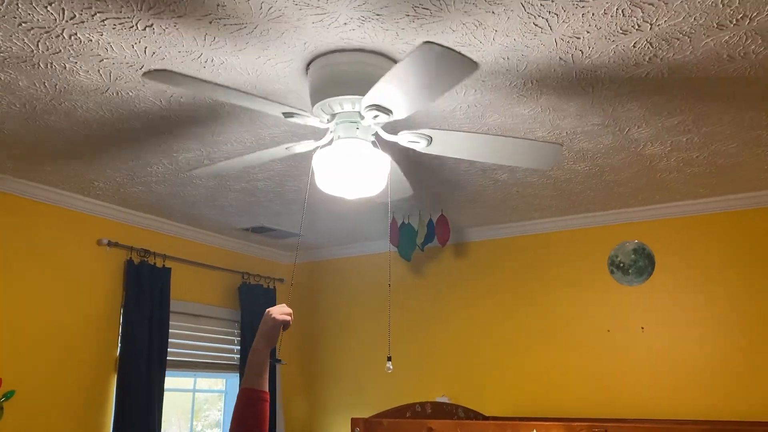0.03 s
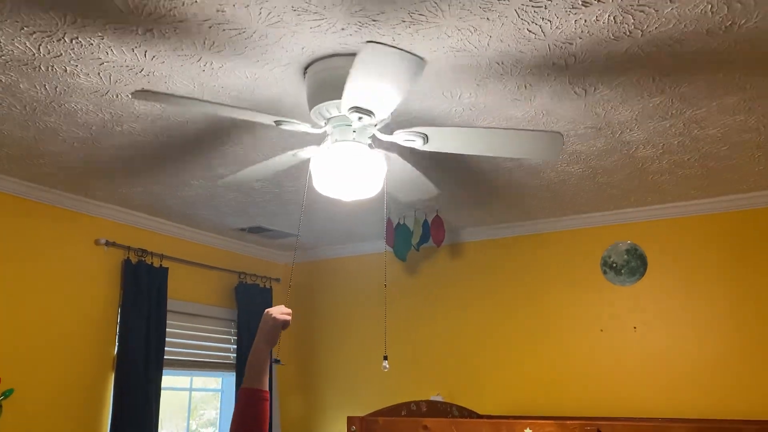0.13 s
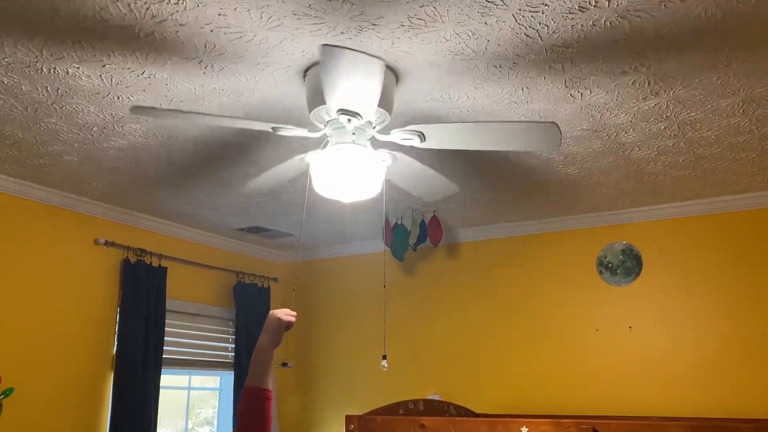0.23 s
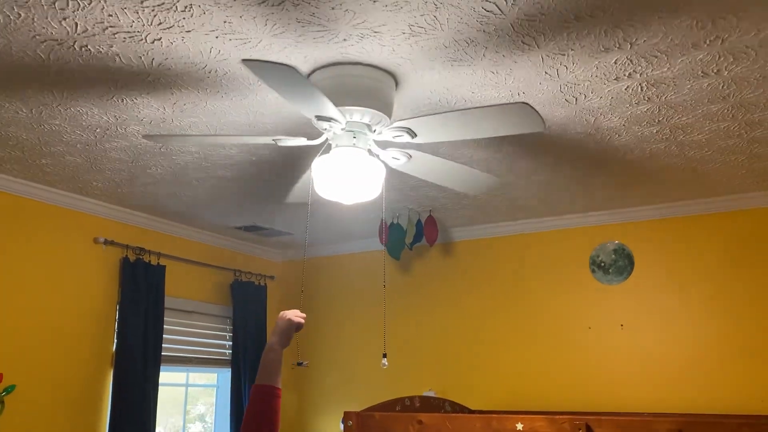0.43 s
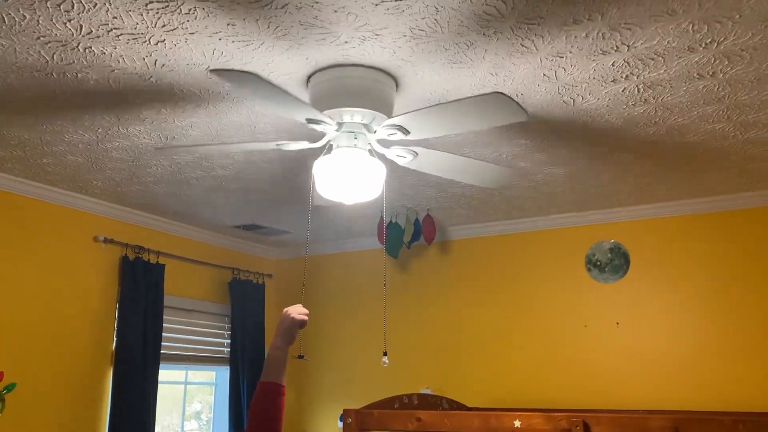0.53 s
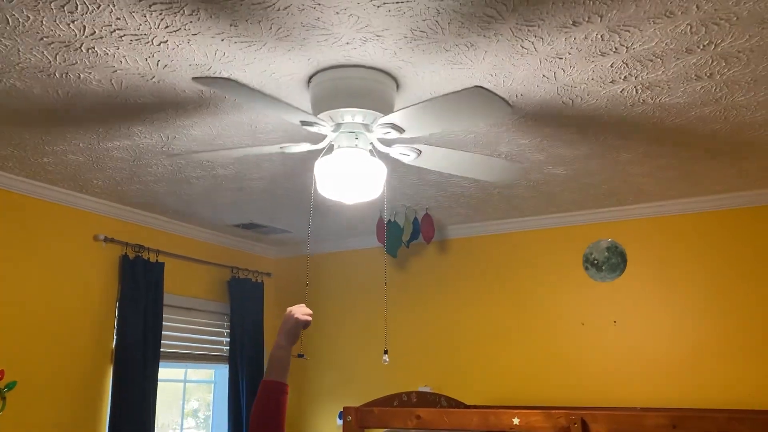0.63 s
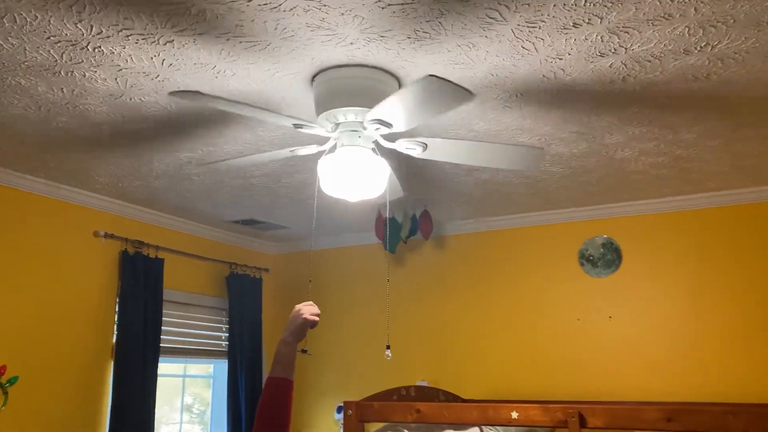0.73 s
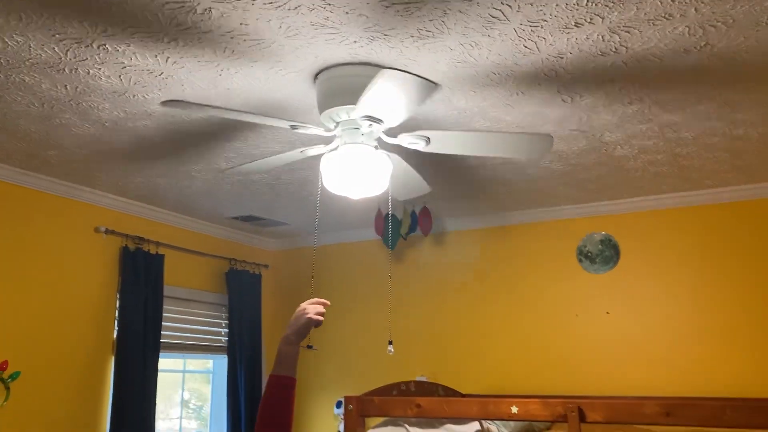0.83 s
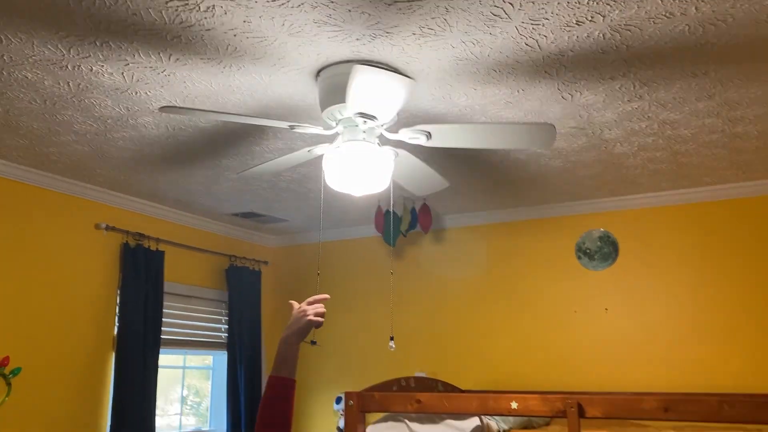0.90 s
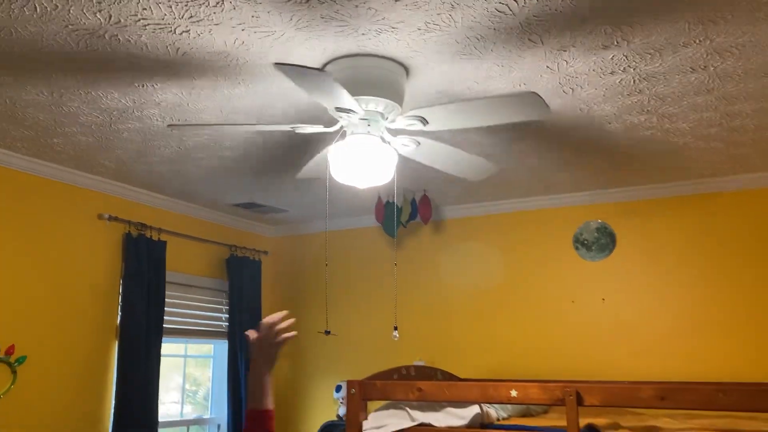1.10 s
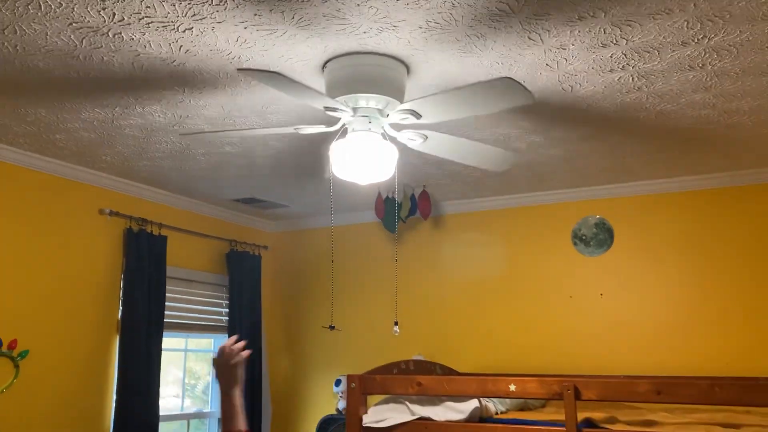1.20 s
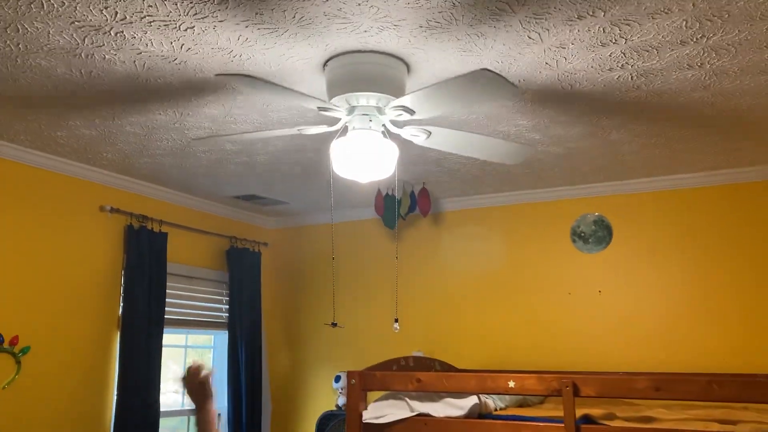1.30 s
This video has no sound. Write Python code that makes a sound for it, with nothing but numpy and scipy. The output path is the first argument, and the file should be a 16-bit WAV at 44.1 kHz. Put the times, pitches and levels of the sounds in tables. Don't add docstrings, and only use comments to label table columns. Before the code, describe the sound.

A ceiling fan pull-chain switch clicks in a small bedroom. A faint ratchet tick comes at 0.1 s, then a quick metallic double click at 0.23 and 0.27 s, the second brighter, with a low thud. A light tick at 0.5 s leads straight into the loudest, driest snap at 0.52 s. Short reverberation fades into faint chain rubbing, soft sleeve brush near 1.0 s, and low steady hum.

```python
import sys
import numpy as np
from scipy import signal
from scipy.fft import rfft, irfft
from scipy.io import wavfile
from scipy.ndimage import map_coordinates

SR = 44100
rng = np.random.default_rng(int(sys.argv[2]) if len(sys.argv) > 2 else 0)


def unload_audio(sound):
    columns = np.transpose(np.atleast_2d(sound))
    steps = np.round(np.clip(columns, -1, 1) * 32767)
    wavfile.write(sys.argv[1], SR, steps.astype(np.int16))


def boost(x):
    u = np.asarray(x, float) / 20
    return 10 ** u


N = 59535

# t/s, level/dB, chatter length/s, treble level/dB, canopy ring level/dB
CONTACTS = [
    (0.1037, -60, 0.0083, -11.5, -6),
    (0.1963, -62.5, .003, -19.5, -18),
    (.2288, -42, 0.011, -11, 4),
    (0.2705, -40.5, 0.0077, 11, 2.5),
    (0.441, -66.5, 0.0082, -3, -20.5),
    (0.5005, -52.5, 0.01, -7, -17),
    (.5240, -30.5, 0.0013, -1.5, -14.5),
]


def at_hz(points, hz):
    f, value = np.array(points).T
    return np.interp(np.log(hz), np.log(f), value)


def in_time(rows):
    return np.interp(np.arange(N) / SR, *np.transpose(rows))


def rms_one(x):
    return x / np.sqrt(np.mean(x ** 2) + 1e-20)


def drift(rate):
    knots = rng.standard_normal(200)
    return map_coordinates(knots, [np.arange(N) / SR * 2 * rate], order=3)


def bands(pair, gain_at):
    # f/Hz, coherence/1
    likeness = [(60, 0.93), (150, 0.7), (300, 0.8), (640, .5), (1400, 0.02), (16000, 0.05)]
    out = 0
    edges = 20 * 2 ** np.arange(0, 9.9, 1 / 3)
    for k, (low, high) in enumerate(zip(edges, edges[1:])):
        band = signal.butter(3, [low, high], "band", fs=SR, output="sos")
        mid, side = signal.sosfilt(band, pair[k % 2])
        hz = np.sqrt(low * high)
        alike = np.clip(at_hz(likeness, hz), 0, 1)
        stereo = np.sqrt(1 + alike) * mid + np.sqrt(1 - alike) * side * [[1], [-1]]
        out = out + gain_at(hz) * stereo
    return out


def coloured(source, colour, patchy_db):
    flicker = bands(source, lambda hz: boost(patchy_db * drift(12)))
    hz = np.arange(1, N // 2 + 2) * SR / N
    return rms_one(irfft(rfft(flicker) * boost(at_hz(colour, hz)), N))


def grains(per_s, spread_db):
    shape = (2, 2, N)
    hit = rng.random(shape) < per_s / SR
    size = boost(spread_db * np.minimum(rng.exponential(1, shape), 4))
    return hit * size * rng.choice([-1, 1], shape)


def chain():
    # t/s, level/dB
    rub = [(0, -60.5), (.07, -72.5), (.12, -60.5), (.2, -64), (.4, -66.5), (.72, -63.5), (.95, -64),
           (1.16, -66.5), (1.3, -83), (1.35, -85)]
    # f/Hz, level per Hz/dB
    rub_colour = [(420, -5), (750, -6.5), (1650, 0.5), (2080, 3), (2600, -9.5), (3000, -24.5), (4200, -15),
                  (6000, -35)]
    return boost(in_time(rub)) * coloured(grains(4000, 1.2), rub_colour, patchy_db=1.5)


def hum():
    # f/Hz, rms level/dB
    lines = [(120, -66.5), (240, -85.5), (360, -81.5)]
    t = np.arange(N) / SR
    return sum(np.sqrt(2) * boost(db) * np.sin(2 * np.pi * hz * t) for hz, db in lines)


def quiet_air():
    # f/Hz, level per Hz/dB
    air_colour = [(22, -15.5), (55, -1), (130, -7), (200, -18), (450, -18.5), (1000, -34), (12500, -51),
                  (15000, -68)]
    return boost(-64.5) * coloured(rng.standard_normal((2, 2, N)), air_colour, patchy_db=2.5)


def mount():
    # t/s, level/dB, length/s, f/Hz
    jolts = [
        (0.092, -52.5, 0.01, 72.5),
        (0.241, -48, 0.031, 68.3),
        (0.273, -48, .09, 78.3),
        (0.556, -57.5, 0.037, 74.3),
        (1.032, -61, .08, 50.6),
        (1.258, -60.5, 0.094, 61.8),
    ]
    attack_s, release_s, sag_db_per_s = 0.0055, 0.0064, 28
    out = np.zeros(N)
    for s, db, length, hz in jolts:
        t = np.arange(N) / SR - s
        swell = np.clip(t / attack_s, 0, 1)
        damping = np.exp(-np.maximum(t - length, 0) / release_s)
        out += np.sqrt(2) * boost(db - sag_db_per_s * t) * swell * damping * np.sin(2 * np.pi * hz * t)
    return out


def strikes(chatter, spans):
    rise_s, rise_db, first_db = .002, -3, 19
    s, db = np.transpose(CONTACTS)[:2, :, None]
    t = np.arange(N) / SR - s
    run_up = boost(rise_db) * np.exp(np.minimum(t, 0) / rise_s)
    dying = np.exp(-(t / spans[:, None]) ** 2)
    rows = chatter * np.where(t > 0, dying, run_up)
    rows[np.arange(len(s)), (s[:, 0] * SR).astype(int)] = boost(first_db)
    return boost(db) * rows / np.sqrt(np.sum(rows ** 2, axis=1, keepdims=True))


def crack(clicks, colour):
    hz = np.linspace(0, SR / 2, 257)
    taps = signal.firwin2(255, hz, boost(2 * at_hz(colour, np.maximum(hz, 1))), fs=SR)
    return signal.fftconvolve(clicks, signal.minimum_phase(taps))[:N]


def ring(clicks, hz, t60):
    r = boost(-60 / (t60 * SR))
    w = 2 * np.pi * hz / SR
    return signal.lfilter([0, np.sin(w)], [1, -2 * r * np.cos(w), r * r], clicks + 1e-18)


def body(hits, pitches, rings):
    scatter_db = 1.5
    own = boost(scatter_db * rng.standard_normal((len(hits), len(pitches))))
    out = 0
    for k, (hz, (db, t60)) in enumerate(zip(pitches, rings)):
        out = out + (-1) ** k * boost(db) * ring(own[:, k] @ hits, hz, t60)
    return out


def switch():
    housing_hz = [965, 1120, 1225, 1460, 1885, 1960, 2100, 2255, 2485, 2690, 2985, 3390, 4250, 4620]
    # level/dB, t60/s
    housing = [(-10, 0.12), (-8.5, 0.14), (-9, .06), (-9, 0.22), (-8.5, 0.041), (-2, 0.12), (-12, 0.026),
               (-10.5, 0.051), (-14, 0.045), (-16.5, 0.017), (-23.5, 0.1), (-20, 0.095), (-14, 0.034),
               (-13.5, 0.053)]
    canopy_hz = [160, 300, 398, 463, 792]
    # level/dB, t60/s
    canopy = [(-9.5, 0.062), (-15, 0.028), (-16.5, .08), (-13.5, 0.072), (-15.5, 0.18)]
    # f/Hz, level/dB
    crack_colour = [(600, -15), (1000, 2), (2000, 11.5), (2600, 5.5), (3600, -2), (4400, -4.5), (6000, -16),
                    (16000, -44)]
    # f/Hz, level/dB
    snap_colour = [(2500, -38), (5500, -14.5), (7500, -11.5), (9000, 0), (10300, -2), (12000, -1.5),
                   (13300, -10.5), (16000, -2)]
    length, treble_db, deep_db = np.transpose(CONTACTS)[2:]
    chatter = grains(5000, 3)[0]
    long = strikes(chatter[0], length)
    short = strikes(chatter[1], np.minimum(length, .0025))
    above = signal.butter(4, 858, "high", fs=SR, output="sos")
    upper = signal.sosfilt(above, body(long, housing_hz, housing))
    lower = body(short * boost(deep_db)[:, None], canopy_hz, canopy)
    dull = boost(27) * crack(long.sum(axis=0), crack_colour)
    bright = boost(27.5) * crack(boost(treble_db) @ short, snap_colour)
    return upper + lower + dull + bright


def bedroom(x):
    # f/Hz, level/dB
    walls = [(300, 3), (1200, -2.5), (2500, 1), (6000, 0.5), (12000, -6.5)]
    # f/Hz, t60/s
    decay = [(100, 0.23), (800, 0.29), (2000, 0.22), (5000, 0.27), (12000, 0.19)]
    build_s = 0.0017
    t = np.arange(N) / SR
    noise = rng.standard_normal((2, 2, N))
    tail = bands(noise, lambda hz: boost(at_hz(walls, hz) - 60 * t / at_hz(decay, hz)))
    tail = tail * (1 - np.exp(-(t / build_s) ** 2))
    tail = tail / np.sqrt(np.sum(tail ** 2) / 2)
    return signal.fftconvolve(x[None], tail, axes=1)[:, :N]


def sleeve():
    # t/s, level/dB
    brush = [(.8, -109), (.95, -78.5), (1.0, -67.5), (1.1, -73), (1.2, -103)]
    # f/Hz, level per Hz/dB
    brush_colour = [(250, -21), (450, 7.5), (900, -12), (2600, -26), (3100, -17.5), (4000, -5), (6000, -20),
                    (8000, -38.5)]
    return boost(in_time(brush)) * coloured(grains(3000, 3.5), brush_colour, patchy_db=2.5)


def scene():
    clicks = switch()
    pan_db = np.array([[1], [-1]])
    near = clicks * boost(pan_db) + boost(3) * bedroom(clicks)
    return near + mount() + chain() + sleeve() + hum() + quiet_air()


def roll_off(x):
    return signal.sosfilt(signal.butter(12, 16790, fs=SR, output="sos"), x)


def record(dry):
    split_hz, in_step_hz, comb_hz, top_hz = 6100, 7020, 4350, 16600
    hz = np.arange(N // 2 + 1) * SR / N
    spectrum = rfft(dry)
    share = 1 / (1 + (split_hz / np.maximum(hz, 1)) ** 8)
    turn = np.exp(1j * np.pi * (hz - in_step_hz) / comb_hz * np.array([[-1], [1]]))
    x = irfft(np.sqrt(1 - share) * spectrum + np.sqrt(share) * turn * spectrum[0], N)
    x = signal.sosfilt(signal.cheby2(10, 60, top_hz, fs=SR, output="sos"), x)
    return roll_off(x)


dry = scene()
out = record(dry)
unload_audio(out)
```